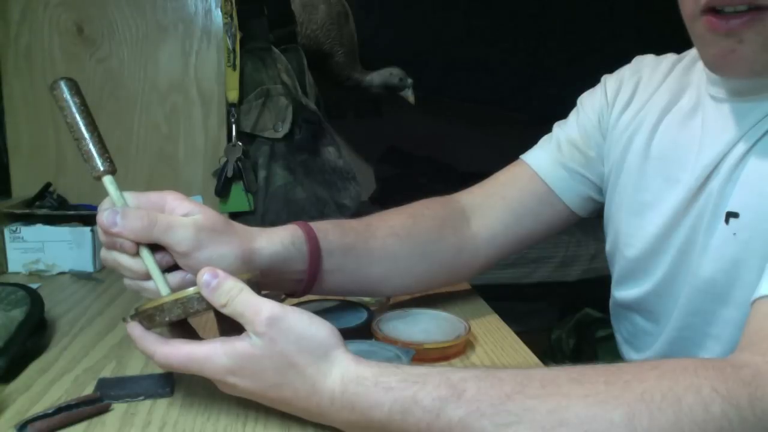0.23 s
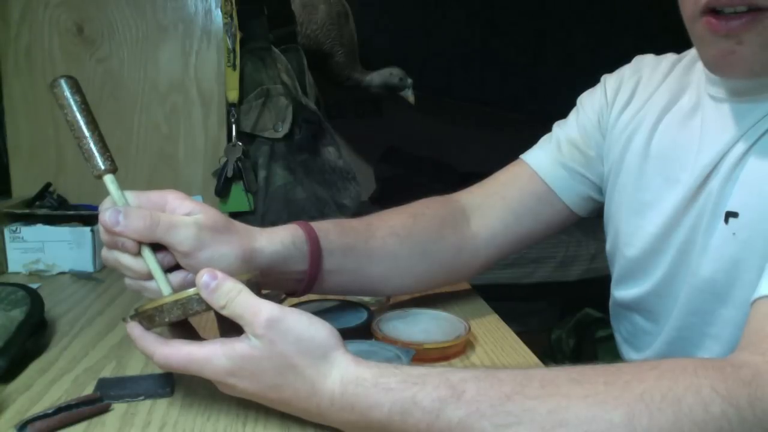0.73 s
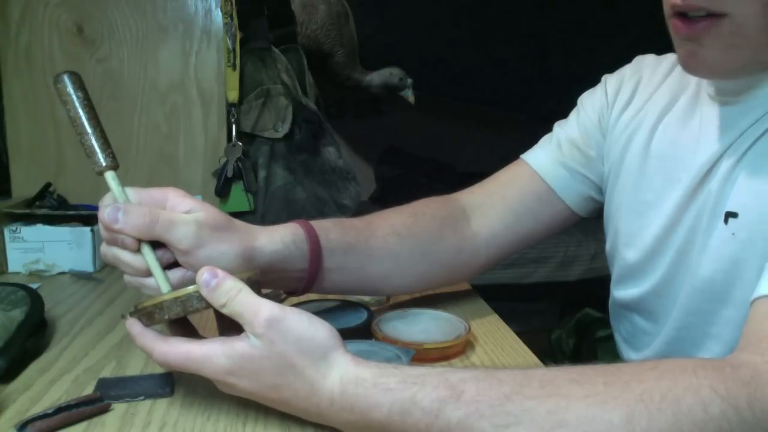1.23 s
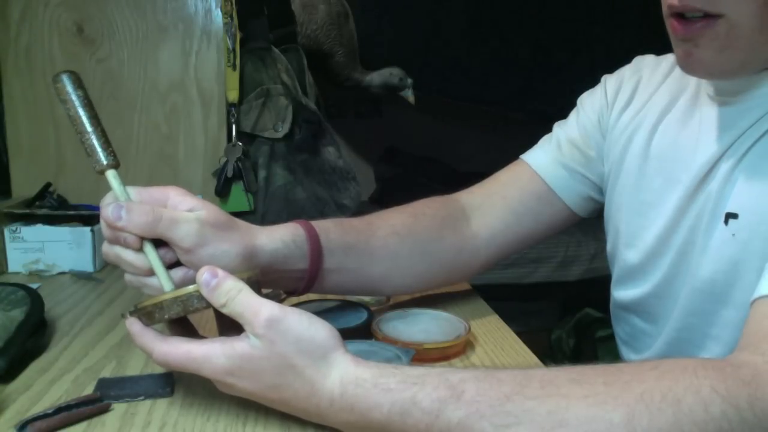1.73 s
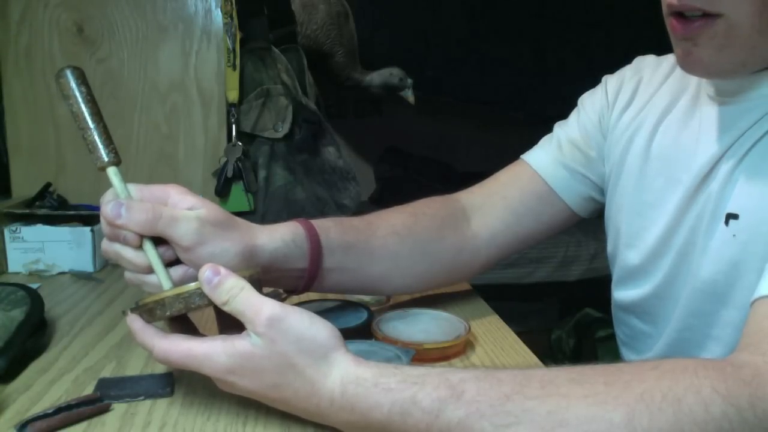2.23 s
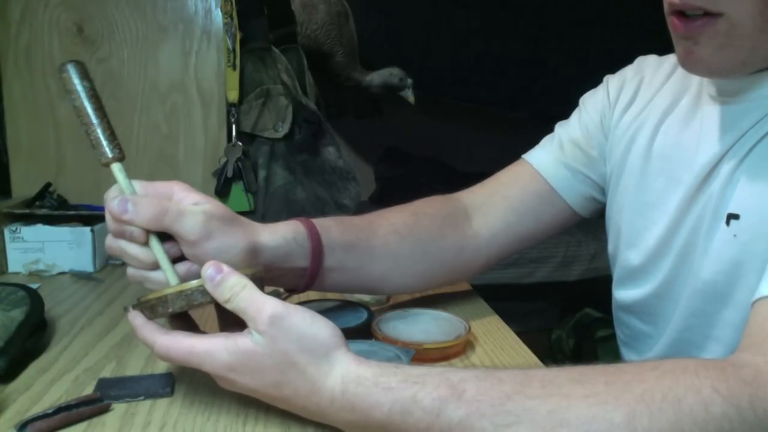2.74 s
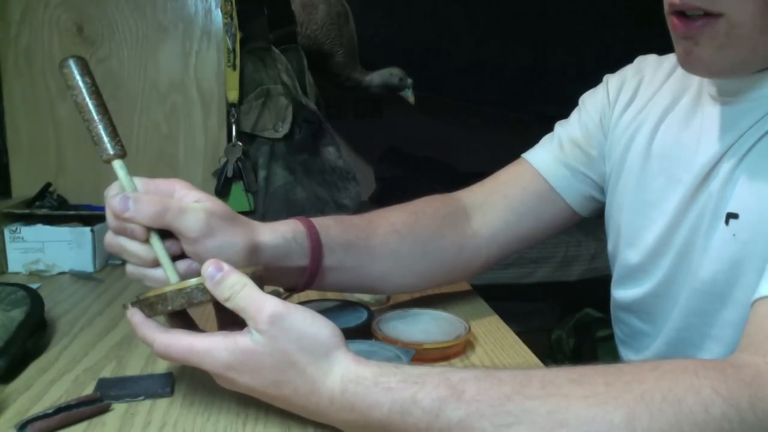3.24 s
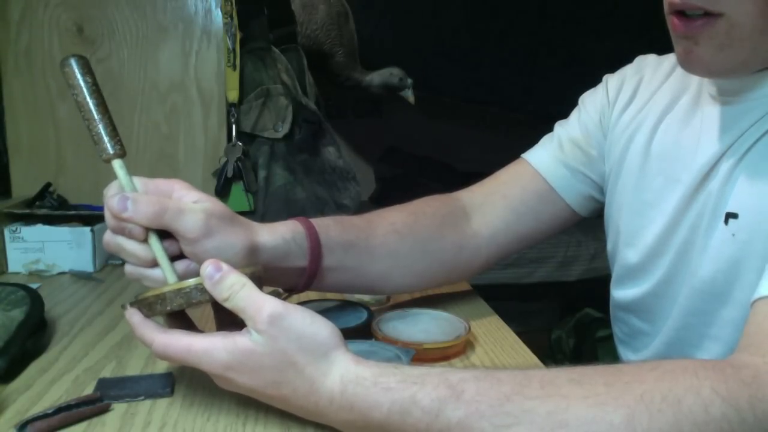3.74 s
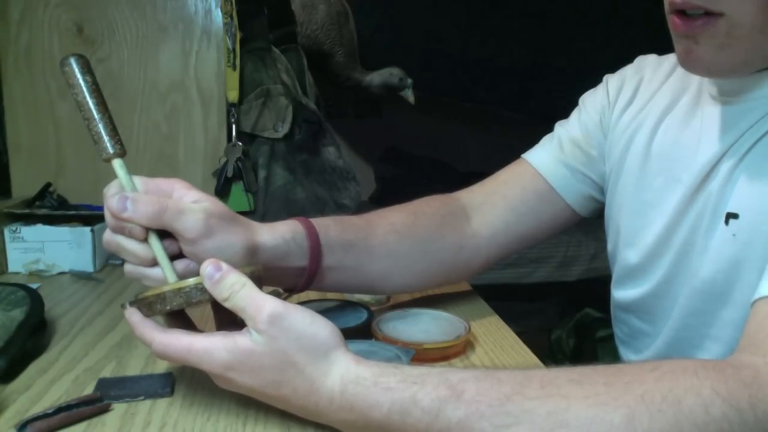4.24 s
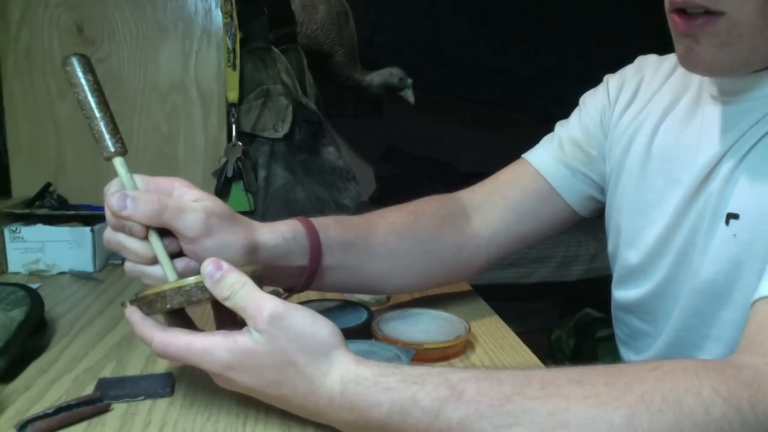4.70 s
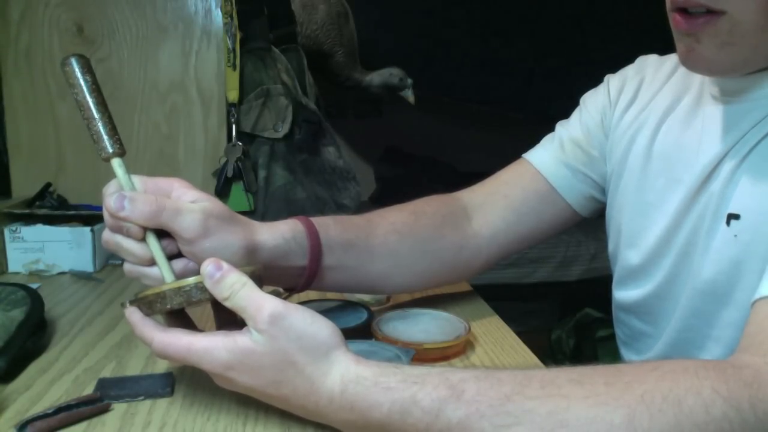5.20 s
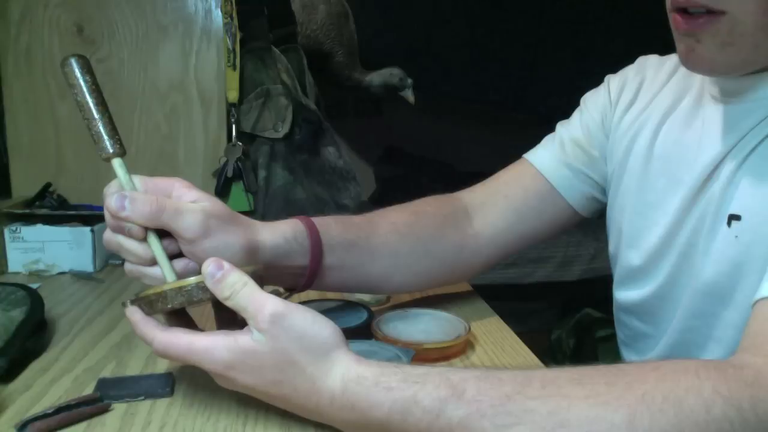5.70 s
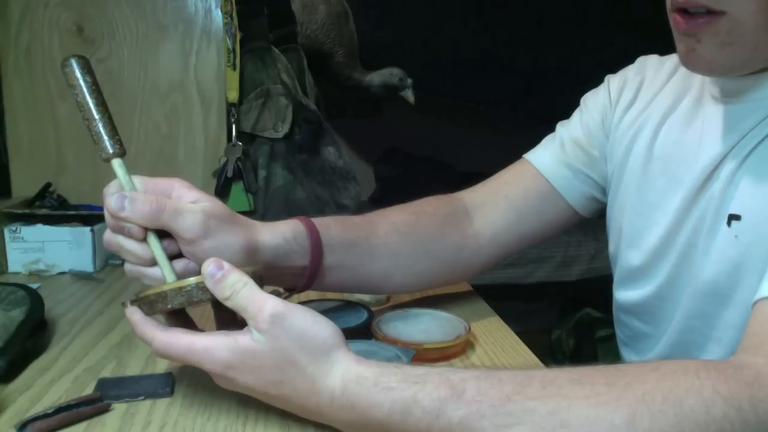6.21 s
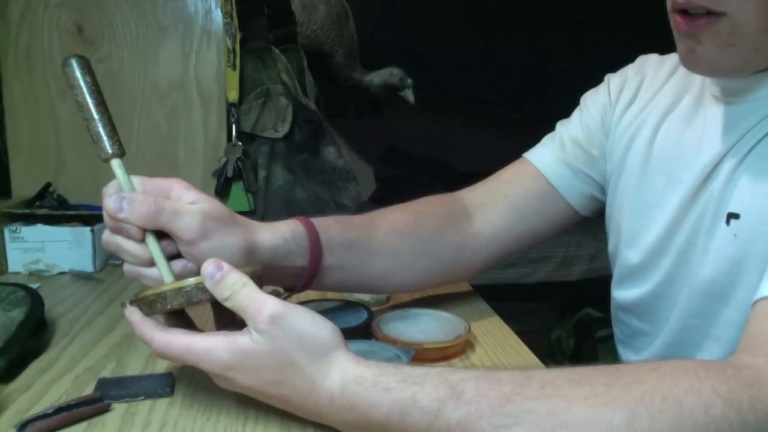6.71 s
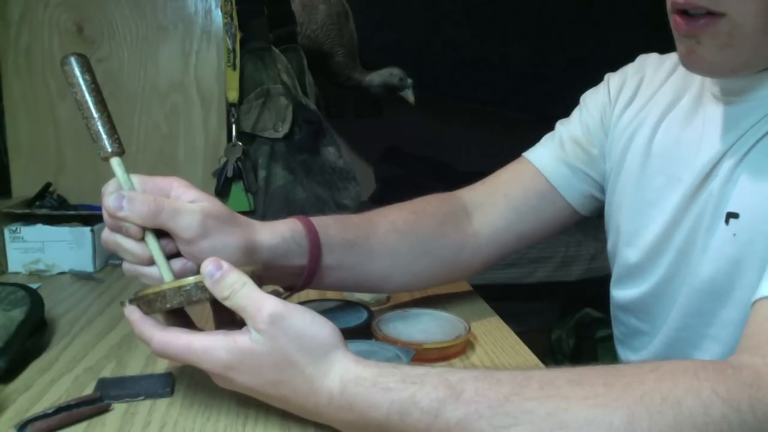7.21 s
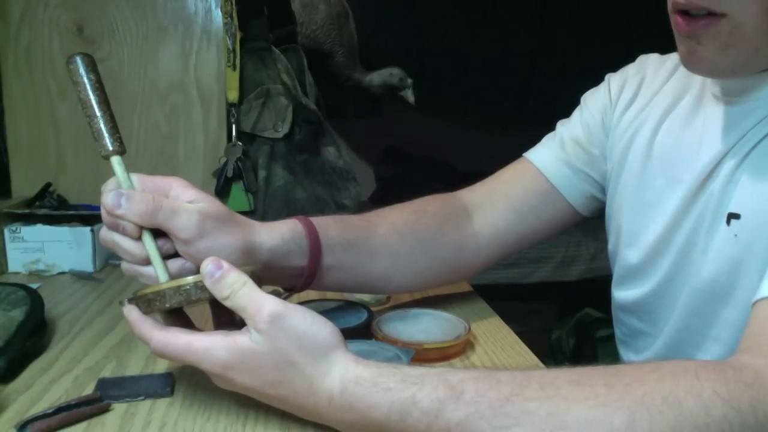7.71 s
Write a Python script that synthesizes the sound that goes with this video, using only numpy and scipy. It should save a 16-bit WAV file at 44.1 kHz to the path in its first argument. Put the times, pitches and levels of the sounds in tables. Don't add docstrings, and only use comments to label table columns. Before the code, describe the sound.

Close in a small room, a slate turkey call purrs quickly, yelps loudly in steady rhythm, fades, then clucks a few times over faint hiss.

```python
import sys
import numpy as np
from scipy import signal
from scipy.fft import rfft, irfft
from scipy.io import wavfile
from scipy.ndimage import uniform_filter1d

SR = 44100
rng = np.random.default_rng(int(sys.argv[2]) if len(sys.argv) > 2 else 0)


def convert_level_to_amplitude(level_db):
    exponent = np.asarray(level_db, float) / 20
    return 10 ** exponent


def store_wav(level_fs):
    pcm = np.round(np.clip(np.atleast_2d(level_fs), -1, 1) * 32767)
    wavfile.write(sys.argv[1], SR, pcm.T.astype(np.int16))


N = 350595

# frequency in Hz, density in dB per Hz.
HISS_SPECTRUM = [(35, -11.5), (95, -38.5), (120, 5.5), (152, -2), (220, 1), (270, -9.5), (413, -2.5),
                 (510, -7), (930, -3.5), (1290, -8), (3760, -17), (4630, -20.5), (7300, -32), (7900, -36.5),
                 (13000, -47)]
# time in seconds, hiss level in dB.
HISS_DRIFT = [(0.0, -60.5), (3.0, -58.5), (4.6, -60), (5.2, -63), (7.95, -64)]
# delay in seconds, level in dB.
ECHOES = [(.0042, -25), (.0078, -23), (.0125, -20.5), (.018, -27.5), (.023, -24.5), (.034, -23.5),
          (.086, -33), (.094, -38.5)]
# frequency in Hz, time to fall 60 dB in seconds.
ROOM_DECAY = [(500, 0.088), (1400, 0.27), (3500, 0.22), (6000, 0.47), (10000, 0.14)]
# start in seconds, length in seconds, level in dB.
SLIDES = [(1.241, 0.022, -68.5), (1.592, 0.053, -79.5), (1.927, .07, -78.5), (2.165, .085, -67.5),
          (2.384, 0.12, -60.5), (2.633, .1, -58), (2.858, .105, -62), (3.121, 0.11, -64), (3.41, .1, -79),
          (3.685, 0.14, -79.5), (3.957, 0.12, -73.5), (4.232, 0.11, -77.5), (4.504, 0.068, -92.5),
          (5.404, .04, -89), (6.188, .055, -67.5), (6.51, .05, -69.5), (6.715, .055, -67)]
# share of the length 0-1, level in dB.
SLIDE_SHAPE = [(0, -5), (.2, -1.5), (.6, -1), (1, -21)]
# frequency in Hz, density in dB per Hz.
SCRAPE_SPECTRUM = [(900, -16), (1300, 10), (1800, 9), (2400, -8), (4500, -3), (6500, -4), (9000, -10),
                   (10800, -4.5), (12000, -9.5), (14000, -25), (15500, -39.5)]
# time in seconds, peak in dB, ring in Hz.
TOUCHES = [
    (1.7928, -23, 1450),
    (3.4208, -10, 1465),
    (3.697, -21, 1623),
    (4.512, -15, 1516),
    (7.16, -48.5, 1600),
    (7.5471, -25.5, 1490),
]
# frequency in Hz, width in Hz, level in dB.
POT_MODES = [(704, 330, -25.5), (1333, 127.8, 5.5), (1567, 128.8, 7), (1787, 164.8, -1.5),
             (2183, 240, -14.5), (2797, 81, -13), (3707, 128, -14.5), (4580, 200, -31), (5650, 390, -41),
             (6600, 700, -43.5), (8300, 2500, -47), (11300, 1200, -49.5)]
# time in seconds, depth in dB.
CATCHES = [(0.453, 12), (.527, 12), (1.311, 6), (1.317, 13.5), (1.324, 3.5), (1.424, 5), (2.107, 19),
           (2.124, 13), (2.132, 6), (2.349, 0), (2.354, -2), (2.817, 15.5), (3.075, 4), (3.364, 16),
           (3.604, 3.5), (3.873, 3.5), (4.175, 12.5), (4.409, 7), (4.413, 6), (4.425, 13), (4.443, 7),
           (7.906, 2)]

# start in seconds, break in seconds, end in seconds, level in dB, lowest slip rate in Hz.
PURRS = [
    (.436, .448, .457, -14, 658),
    (.511, .527, .54, -15, 711),
    (.604, .622, .642, -11, 611),
    (.69, .713, .739, -7, 597),
    (1.297, 1.334, 1.376, -18, 751),
    (1.407, 1.422, 1.446, -11, 727),
    (4.406, 4.424, 4.451, -15, 695),
]
YELPS = [
    (2.078, 2.102, 2.143, -7, 702.5),
    (2.306, 2.34, 2.385, -2.5, 577.5),
    (2.541, 2.582, 2.622, -0.5, 594.5),
    (2.774, 2.807, 2.845, 1, 732),
    (3.028, 3.065, 3.113, -2, 733.6),
    (3.297, 3.344, 3.384, -6.5, 746),
    (1.82, 1.856, 1.914, -20, 576),
    (4.126, 4.176, 4.208, -14, 618),
]
SOFT_YELPS = [
    (3.581, 3.613, 3.672, -11, 588.6),
    (3.843, 3.881, 3.932, -12, 588),
]
CLUCKS = [
    (1.531, 1.55, 1.569, -10, 596.4),
    (5.297, 5.318, 5.335, -12, 532.6),
    (6.121, 6.139, 6.157, -5, 557.2),
    (6.432, 6.451, 6.468, -7.5, 605),
    (6.64, 6.66, 6.68, -3.5, 599),
    (7.891, 7.906, 7.924, 0.5, 654),
]
SQUEAKS = [
    (.13, 0.14, .148, -53.5, 682),
    (.237, 0.242, .258, -38, 648),
    (.298, 0.306, .335, -40, 668),
    (.356, 0.364, .385, -40, 695),
    (1.225, 1.246, 1.275, -38, 674),
    (7.601, 7.606, 7.622, -47, 718),
]

# place (0 start, 1 break, 2 end), level in dB,
# sag of the rate (0 front, 0.5 knee, 1 lowest).
PURR_SHAPE = [(0, -9, 0), (.3, -1.5, .8), (1, -4, 0.98), (1.62, 0, 0.99), (1.85, -4.5, 1), (2, -18.5, 0.94)]
YELP_SHAPE = [(0, -26.5, 0.0037), (.54, -8, .06), (.72, -1.5, .42), (.96, 0, .5), (1.05, -1.5, .95),
              (1.3, -1.5, 1), (1.84, -2, 1), (2.001, -22, 1)]
SOFT_YELP_SHAPE = [(0, -19.5, 0), (.32, 1.5, 0.077), (.62, -2, .08), (.95, 4, .85), (1.15, -2.5, 0.95),
                   (1.4, 0.5, 1), (1.8, -3.5, 1), (2, -17.5, 1)]
CLUCK_SHAPE = [(0, -18.5, 0), (.14, -3.5, .3), (.5, -0.5, 1), (1, -6.5, 0.99), (1.55, -1.5, 1),
               (2, -19.5, 0.99)]
SQUEAK_SHAPE = [(0, -16, 1), (1, 1, 0.95), (1.5, -5.5, 0.79), (2, -22, 1)]

# front rate at full press in Hz, share of the lowest rate added to it,
# return to rest after the break 0-1, lateness of that return, loss in dB per Hz under the knee.
PURR_HAND = (208.5, 1, 1.52, 1.37, 0)
YELP_HAND = (914.5, 0, 0.7, 2.5, 0.06)
SOFT_YELP_HAND = (914.5, 0, 1.1, 2.4, 0.12)
CLUCK_HAND = (139.5, 1, 1.42, 1.19, 0)
SQUEAK_HAND = (0, 1, 1.7, 1.5, 0.01)

YELP_GRIT, CLUCK_GRIT, SQUEAK_GRIT = 0.14, 0.24, 0.06
REST_HZ, KNEE_HZ = 733.2, 695
FRONT_HZ_PER_DB = 12
CATCH_S = 0.0028
ROOM_DB = -18


def evened(x):
    return x / np.sqrt(np.mean(abs(x) ** 2) + 1e-20)


def read_db(points, hz):
    f, value = np.transpose(points)
    return np.interp(np.log(hz + 1), np.log(f + 1), value)


def add(mix, start_s, sound):
    part = mix[round(start_s * SR):][:len(sound)]
    part += sound[:len(part)]


def hiss():
    frames, hz = N // 256 + 5, np.fft.rfftfreq(1024, 1 / SR)
    real, imag, patches = rng.standard_normal((frames, 513, 3)).T
    patches = uniform_filter1d(patches, size=8, axis=0)
    patches = evened(uniform_filter1d(patches, size=10, axis=1))
    level_db = read_db(HISS_SPECTRUM, hz)[:, None] + 1.4 * patches
    noise = signal.istft((real + 1j * imag) * convert_level_to_amplitude(level_db), nperseg=1024, noverlap=768)[1][:N]
    s, drift_db = np.transpose(HISS_DRIFT)
    return evened(noise) * convert_level_to_amplitude(np.interp(np.arange(N) / SR, s, drift_db))


def room(x):
    taps = np.zeros(SR // 2)
    at = np.arange(500, len(taps) - 20, 20)
    taps[at + rng.integers(0, 20, len(at))] = rng.choice([-1., 1.], len(at))
    hz, t, bands = signal.stft(taps, SR, nperseg=256)
    decay_db = -60 * t / read_db(ROOM_DECAY, hz)[:, None]
    response = signal.istft(bands * convert_level_to_amplitude(decay_db), SR, nperseg=256)[1]
    response *= convert_level_to_amplitude(ROOM_DB) / np.linalg.norm(response)
    response[0] = 1
    for k, (delay_s, db) in enumerate(ECHOES):
        response[round(delay_s * SR)] += (-1) ** k * convert_level_to_amplitude(db)
    return signal.fftconvolve(x, response / np.linalg.norm(response))[:N]


def slide(start_s, length_s, db):
    share, shape_db = np.transpose(SLIDE_SHAPE)
    s = start_s + share * length_s
    t = np.arange(s[0], s[-1], 1 / SR)
    sand, uneven = rng.standard_normal((2, 8192))
    sand *= convert_level_to_amplitude(3.5 * evened(uniform_filter1d(uneven, size=160)))
    color = convert_level_to_amplitude(read_db(SCRAPE_SPECTRUM, np.fft.rfftfreq(8192, 1 / SR)))
    scrape = irfft(rfft(sand) * color)[:len(t)]
    level_db = np.interp(t, s, db + shape_db) + 12.5
    return s[0], convert_level_to_amplitude(level_db) * scrape * signal.windows.tukey(len(t), 0.2)


def pot(hz):
    modes = 0
    for k, (f, width_hz, db) in enumerate(POT_MODES):
        damping = 1j * hz * width_hz
        modes = modes + (-1) ** k * convert_level_to_amplitude(db) * damping / (f ** 2 - hz ** 2 + damping)
    dip = (1143.0 ** 2 - hz ** 2 + 1j * hz * 130.0) / (1154.0 ** 2 - hz ** 2 + 1j * hz * 270.0)
    top = 1 / (1 + 1.4j * hz / 12000 - (hz / 12000) ** 2) ** 2
    bass = (1j * hz / (1j * hz + 833.0)) ** 2
    return modes * dip * top * bass


def touch(db, hz):
    t = np.arange(2048) / SR
    ring = np.sin(2 * np.pi * hz * t) * convert_level_to_amplitude(-60 * t / 0.026) * np.clip(t / 0.002, 0, 1)
    body = uniform_filter1d(irfft(pot(np.fft.rfftfreq(2048, 1 / SR))), size=9)
    return convert_level_to_amplitude(db) * (ring + 0.3 * body / abs(body).max())


def grip():
    t = np.arange(0, N, 16) / SR
    lost_db = sum(db * np.exp(-((t - s) / CATCH_S) ** 2) for s, db in CATCHES)
    return convert_level_to_amplitude(-np.interp(np.arange(N) / SR, t, lost_db))


def unfold(row, shape, hand):
    start_s, break_s, end_s, db, low_hz = row
    full_hz, follow, ease, late, loss = hand
    place, shape_db, sag = np.transpose(shape)
    front_hz = max(full_hz + follow * low_hz + FRONT_HZ_PER_DB * db, low_hz, KNEE_HZ * (1 - follow))
    knee_hz = max(low_hz + 15, min(KNEE_HZ, front_hz))
    hz = np.interp(sag, [0, 0.5, 1], [front_hz, knee_hz, low_hz])
    hz = hz + (REST_HZ - hz) * ease * np.clip(place - 1, 0, 1) ** late
    s = np.interp(place, [0, 1, 2], [start_s, break_s, end_s])
    level_db = db + shape_db - loss * np.maximum(KNEE_HZ - hz, 0)
    return np.transpose([s, level_db, hz])


def slip_train(turns, hz, level_db):
    k = np.arange(1, 21)[:, None]
    soft_db = 0.21 * np.clip(-level_db - 8, 0, 60) + 0.8 * np.clip(-level_db - 27, 0, 60)
    sharp = convert_level_to_amplitude(-soft_db * np.log2(np.maximum(k * hz / 1600, 1)))
    reach = np.sqrt((abs(sharp * pot(k * hz)) ** 2).sum(0) / 2)
    slips = (sharp * np.cos(2 * np.pi * k * turns)).sum(0)
    return slips / uniform_filter1d(reach, size=80)


def stroke(rows, grit, lift):
    s, *columns = np.transpose(sorted(map(tuple, rows)))
    t = np.arange(s[0] - 0.002, s[-1] + 0.0013, 1 / SR)
    level_db, hz = (np.interp(t, s, c) for c in columns)
    level_db = uniform_filter1d(level_db, size=110)
    grit = grit * np.clip(1 + (700 - hz) / 130, 1, 1.65)
    waver, flutter, sand = rng.standard_normal((3, 6000))[:, :len(t)]
    waver = evened(uniform_filter1d(waver, size=130))
    flutter = evened(uniform_filter1d(flutter, size=100))

    hz = uniform_filter1d(hz, size=60) * (1 + 0.076 * grit * waver)
    hz *= 1 + lift * np.exp((t - t[-1]) / 0.006)
    turns = np.cumsum(hz) / SR
    slips = slip_train(turns, hz, level_db) * convert_level_to_amplitude(8.03 * grit * flutter)

    response = pot(np.fft.rfftfreq(8192, 1 / SR))
    gate = 0.13 + np.exp(-(turns % 1) / 0.34)
    grains = signal.lfilter([1], [1, -0.25], sand * gate)
    grains /= np.std(irfft(rfft(grains, 8192) * response)[:len(t)])

    edge = np.clip(np.minimum(t - t[0], t[-1] - t) / 0.0016, 0, 1)
    drive = convert_level_to_amplitude(level_db) * edge * (np.sqrt(1 - grit ** 2) * slips + grit * grains)
    return t[0], irfft(rfft(drive, 8192) * response)


def scene():
    call = np.zeros(N)
    for table, shape, hand, grit, lift in (
            (PURRS, PURR_SHAPE, PURR_HAND, YELP_GRIT, 0.18),
            (YELPS, YELP_SHAPE, YELP_HAND, YELP_GRIT, 0.18),
            (SOFT_YELPS, SOFT_YELP_SHAPE, SOFT_YELP_HAND, YELP_GRIT, 0.1),
            (CLUCKS, CLUCK_SHAPE, CLUCK_HAND, CLUCK_GRIT, 0.05),
            (SQUEAKS, SQUEAK_SHAPE, SQUEAK_HAND, SQUEAK_GRIT, 0.02)):
        for row in table:
            add(call, *stroke(unfold(row, shape, hand), grit, lift))
    call = call * grip()
    for start_s, length_s, db in SLIDES:
        add(call, *slide(start_s, length_s, db))
    for s, db, hz in TOUCHES:
        add(call, s, touch(db, hz))
    return (convert_level_to_amplitude(-0.5) * room(call) + hiss())[None]


def roll_off(x):
    return signal.sosfilt(signal.butter(12, 15770, fs=SR, output="sos"), x)


def record(dry):
    clipped = np.clip(dry, -0.9, 0.9)
    cut = signal.sosfilt(signal.butter(2, 140, "high", fs=SR, output="sos"), clipped)
    lowpass = signal.firwin(255, 15600, window=("kaiser", 8), fs=SR)
    cut = signal.oaconvolve(cut, lowpass[None], "same")
    return roll_off(cut)


dry = scene()
out = record(dry)
store_wav(out)
```